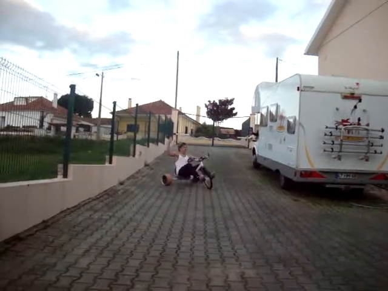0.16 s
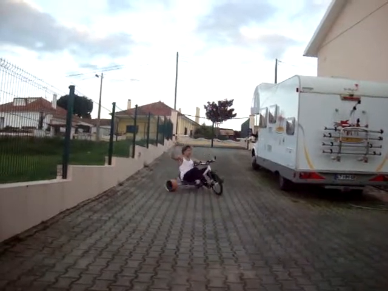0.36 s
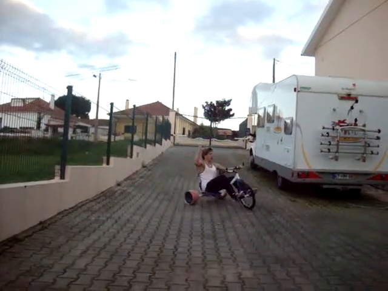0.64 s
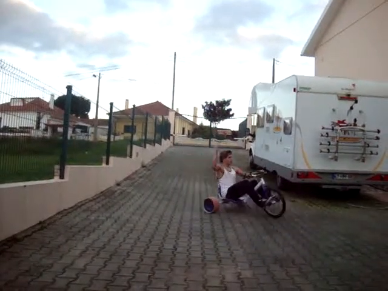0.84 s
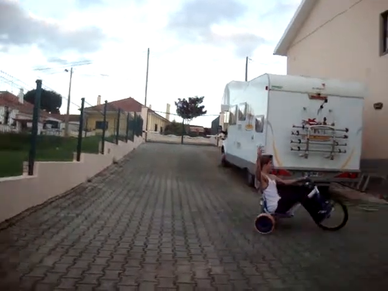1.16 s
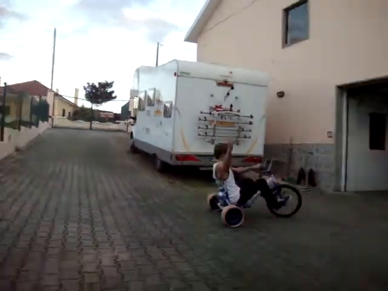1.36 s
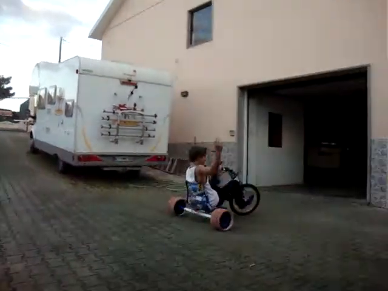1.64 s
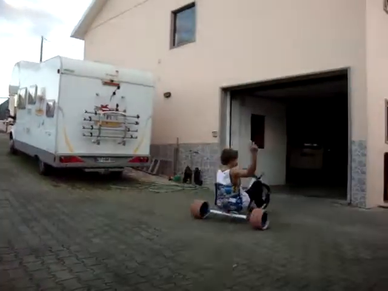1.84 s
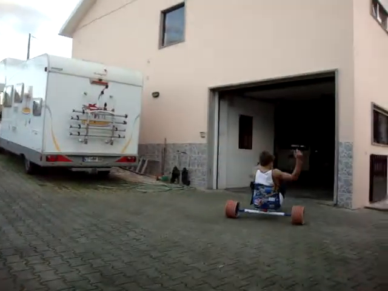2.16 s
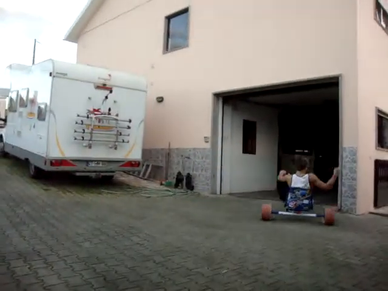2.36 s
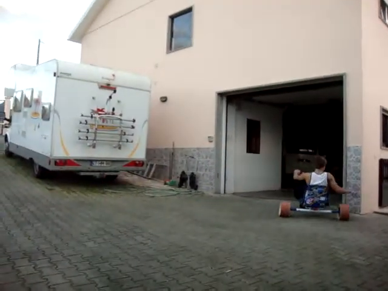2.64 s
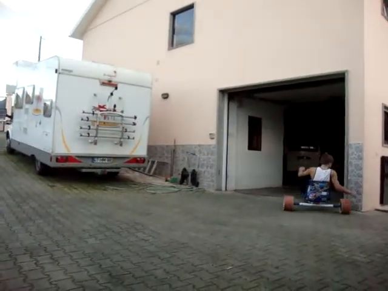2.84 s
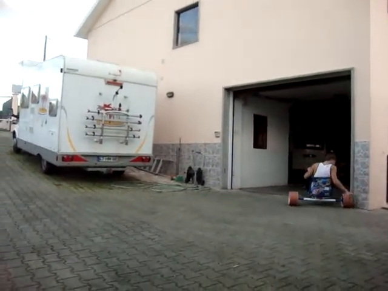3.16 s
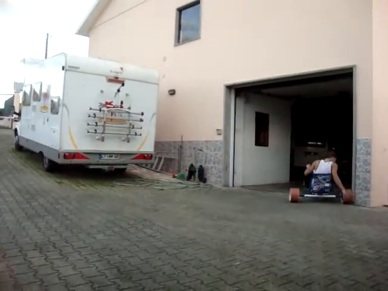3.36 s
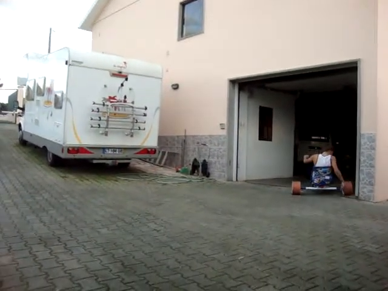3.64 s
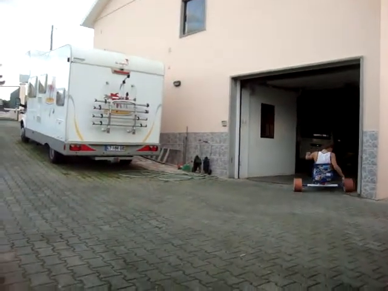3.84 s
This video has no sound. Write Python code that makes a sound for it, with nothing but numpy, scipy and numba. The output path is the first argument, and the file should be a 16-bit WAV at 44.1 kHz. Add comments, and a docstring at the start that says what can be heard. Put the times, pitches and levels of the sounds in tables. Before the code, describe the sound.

A drift trike's hard plastic wheels scrape and rumble over block paving, squealing briefly as it swings round, then crackle to a near stop before a loud, reverberant bang at an open garage; quiet outdoor air.

```python
"""Drift trike sliding into a garage doorway

A drift trike slides past on block paving, swings round and slows at an open garage. Filtered random
clicks give the grit grinding under its plastic rear sleeves, their chatter, hiss and the rolling rumble.
Gliding resonances squeal, then the trike bumps the doorway: noise bursts crack and reverberate in the
garage while decaying modes ring. Coloured noise makes a quiet outdoor background with soft buffets."""
import sys
import numpy as np
from scipy import signal
from scipy.fft import rfft, irfft
from scipy.io import wavfile
from numba import njit

SR = 44100
rng = np.random.default_rng(int(sys.argv[2]) if len(sys.argv) > 2 else 0)


def log_audio(samples):
    """Write samples as a 16-bit WAV file to the path given in sys.argv[1]."""
    # one column per channel
    frames = np.atleast_2d(samples).T
    # limit to full scale, then quantise
    limited = np.clip(frames, -1, 1)
    pcm = np.round(limited * 32767).astype(np.int16)
    wavfile.write(sys.argv[1], SR, pcm)


N = 176400

# Blows against the doorway: a graze, the hit, its rattle and the rebounds
# [t/s, relative crack level/dB, contact decay time/s, relative ring level/dB]
BLOWS = [(3.2107, -7.5, 0.014, -18), (3.2237, -1.5, 0.0036, 0), (3.2287, -4, 0.0092, -19),
         (3.274, -12.5, 0.022, -10.5), (3.326, -24.5, 0.022, -15.5)]


def undb(db):
    """Amplitude ratio: twenty decibels are a factor of ten."""
    return 10 ** (np.asarray(db) / 20)


def unit(x):
    """Normalisation to a root-mean-square value of 1."""
    return x / np.sqrt(np.mean(x ** 2))


def clock():
    """Uniform sampling: the time of every sample in seconds."""
    return np.arange(N) / SR


def on_log_axis(points):
    """Interpolation on a logarithmic frequency axis: (f/Hz, value) points read at every spectral bin."""
    hz, value = np.array(points, float).T
    bins_hz = np.arange(N // 2 + 1) * SR / N
    return np.interp(np.log(bins_hz + 1), np.log(hz), value)


def colour(x, points):
    """Minimum-phase filtering: a causal response of unit energy with the given (f/Hz, level/dB) shape."""
    cepstrum = irfft(np.log(undb(on_log_axis(points))), N)
    # keeping only the positive-time half of the cepstrum makes the response causal
    causal = 2 * cepstrum[:N // 2] * (np.arange(N // 2) > 0)
    response = irfft(np.exp(rfft(causal, N)), N)[:2048]
    return signal.fftconvolve(x, response / np.linalg.norm(response))[:N]


@njit
def svf(x, hz, width):
    """State-variable resonator: two coupled integrators form a band-pass whose centre may move."""
    y, band_state, low_state = np.empty(len(x)), 0., 0.
    for i in range(len(x)):
        g = np.tan(np.pi * hz[i] / SR)
        damping = width / hz[i]
        v = (band_state + g * (x[i] - low_state)) / (1 + g * (g + damping))
        band_state = 2 * v - band_state
        low_state = low_state + 2 * g * v
        y[i] = damping * v
    return y


def band(x, hz, width, order=1):
    """Cascaded resonance: each repetition of the band-pass steepens its sides."""
    for _ in range(order):
        x = svf(x, hz * np.ones(N), float(width))
    return x


def walk(rate):
    """Random fluctuation: random knots, rate per second, joined by lines, with a spread near 1."""
    knots = rng.standard_normal(4096)
    return 1.2 * np.interp(clock() * rate, np.arange(len(knots)), knots)


def clicks(rate, spread_db):
    """Random impulses: independent sizes; positive spread makes a few much larger, negative smaller."""
    sizes = undb(spread_db * np.minimum(rng.exponential(size=N), 6))
    return (rng.random(N) < rate / SR) * sizes


def grit():
    """Shot noise: a dense crackle of random clicks with random sign."""
    return unit(clicks(rate=13000, spread_db=2.32) * rng.choice([-1, 1], N))


def contact(start, length):
    """Transient excitation: a rough contact is sudden noise with exponential decay and unit energy."""
    age = clock() - start
    decay = np.exp(-np.clip(age / length, 0, 60))
    burst = rng.standard_normal(N) * (age >= 0) * decay
    return burst / np.linalg.norm(burst)


def paving_load():
    """Amplitude modulation: paving joints jolt the trike and a random judder varies its load."""
    joint_decay_s, joint_depth, judder_db = 0.0028, 0.14, 0.94
    joints = clicks(rate=110, spread_db=-1)
    jolts = signal.lfilter([1], [1, -np.exp(-1 / (joint_decay_s * SR))], joints)
    judder = undb(judder_db * walk(34))
    return unit((1 + joint_depth * unit(jolts)) * judder)


def grinding():
    """Forced resonance: crushed grit grinds and slips excite the plastic sleeves into chatter."""
    # Grinding spectrum [f/Hz, relative spectral level/dB]
    grind_shape = [(500, -46), (1000, -7), (1500, -4), (2000, 0), (2600, 0.5), (3300, -1.5), (4000, -3),
                   (4800, -4.5), (6500, -15.5), (10000, -52)]
    # Sleeve resonances [f/Hz before the pitch ratio, width/Hz, relative level/dB]
    sleeve = [(2100, 420, -3.5), (2290, 210, 2.5), (2443, 180, 7.5), (3200, 190, -5), (3480, 250, -8)]
    # Wandering pitch of the chatter [t/s, frequency ratio]
    sleeve_pitch = [(0, 0.89), (.6, 1.06), (1.1, 0.99), (1.3, 0.93), (1.65, 1), (2.27, 1), (2.39, .91),
                    (2.55, 1.05), (2.7, 0.94), (2.9, 1)]
    grind_gain_db, chatter_gain_db, slip_spread_db = -1.5, -4.5, 2
    slips = grit() * undb(slip_spread_db * walk(130))
    pitch = np.interp(clock(), *np.array(sleeve_pitch).T)
    chatter = unit(sum(undb(db) * band(slips, hz * pitch, width) for hz, width, db in sleeve))
    return undb(grind_gain_db) * colour(grit(), grind_shape) + undb(chatter_gain_db) * chatter


def hissing():
    """Band-passed friction noise: a flickering hiss with a steady skirt on a lower moving centre."""
    # Moving centre of the hiss [t/s, f/Hz]
    hiss_centre = [(0, 5660), (.42, 6150), (.92, 6070), (1.27, 5350), (1.53, 5750), (1.72, 6330),
                   (2.0, 5520), (2.35, 5410), (2.8, 4700)]
    hiss_gain_db, flicker_db, skirt_gain_db, skirt_ratio = -2, 2.33, -2, 0.843
    centre = np.interp(clock(), *np.array(hiss_centre).T)
    flicker = undb(hiss_gain_db + flicker_db * walk(70))
    core = flicker * unit(band(grit(), centre, width=2130, order=3))
    skirt = unit(band(grit(), skirt_ratio * centre, width=2550, order=3))
    return core + undb(skirt_gain_db) * skirt


def rolling():
    """Broadband rolling excitation: rumble, and a hollow drone of the wheels on the blocks."""
    # Rumble spectrum [f/Hz, relative spectral level/dB]
    roll_shape = [(40, -39.5), (110, -29), (150, -22), (195, -13), (290, -6), (380, -1.5), (520, 2.5),
                  (850, 4.5), (1150, 0.5), (1700, -2), (3500, -27.5)]
    drone_gain_db, drone_end_s, drone_fade_s = -10, 1.54, 0.031
    # the drone ends as the trike swings toward the garage
    fade = np.clip((drone_end_s - clock()) / drone_fade_s, 0, 1)
    drone = fade * unit(band(grit(), 375.4, width=72, order=2))
    return colour(grit(), roll_shape) + undb(drone_gain_db) * drone


def fizzing():
    """High-frequency noise: a fizzing treble band with a random flicker in level."""
    # Treble spectrum [f/Hz, relative spectral level/dB]
    fizz_shape = [(4000, -34.5), (6000, -13.5), (7200, 2.5), (8200, 1), (10000, -1.5)]
    gain_db, flicker_db = 5, 2.4
    return undb(gain_db + flicker_db * walk(70)) * colour(grit(), fizz_shape)


def slide():
    """Superposition under a common load: grinding, hiss, rumble and treble follow the sliding levels."""
    # Course of the slide, relative levels
    # [t/s, grinding level/dB, sleeve hiss level/dB, rumble level/dB, top treble level/dB]
    slide_levels = [(0, -24, -28, -33, -37.5), (0.151, -20, -23.5, -27.5, -34.5),
                    (0.31, -24, -30.5, -32.5, -37.5), (0.39, -20.5, -26.5, -35.5, -36),
                    (0.49, -23.5, -28, -33.5, -37), (0.57, -20.5, -27.5, -30.5, -40),
                    (0.66, -25.5, -27.5, -31.5, -37.5), (0.8, -21.5, -27.5, -30.5, -43.5),
                    (0.87, -27, -30, -32.5, -45), (0.97, -21.5, -25, -31, -41.5), (1.1, -22, -26, -29, -47),
                    (1.27, -20.5, -24, -31.5, -42.5), (1.38, -23.5, -26, -30.5, -49),
                    (1.5, -22.5, -23.5, -32, -47), (1.55, -23.5, -25.5, -38.5, -39),
                    (1.63, -22.5, -28, -38.5, -43), (1.8, -26.5, -32, -34, -42),
                    (1.91, -22.5, -30, -33.0, -41.5), (2.01, -26.5, -30.5, -31, -38.5),
                    (2.24, -21.5, -31, -34.5, -39), (2.38, -24, -32.5, -32, -39.5),
                    (2.48, -26, -34, -35, -41), (2.6, -26, -31.5, -40.5, -46),
                    (2.71, -28.5, -46, -38.5, -50), (2.81, -34.5, -44, -45, -56),
                    (2.91, -43.5, -56, -48.5, -71), (3.04, -55, -62, -51.5, -63), (3.2, -78, -81, -60, -82)]
    t = clock()
    when, *levels = np.array(slide_levels).T
    # the slide fades out over the 20 ms before the main hit
    moving = np.clip((BLOWS[1][0] - t) / .02, 0, 1)
    grind, hiss, roll, fizz = (undb(np.interp(t, when, db)) * moving for db in levels)
    layers = grind * grinding() + hiss * hissing() + roll * rolling() + fizz * fizzing()
    return paving_load() * layers


def outdoors():
    """Coloured noise: a faint distant hum, with soft buffets of air on the microphone."""
    # Neighbourhood spectrum [f/Hz, relative spectral level/dB]
    air_shape = [(30, -29.5), (120, -19.5), (250, -5.5), (420, -7.5), (520, 4), (650, -10), (850, -1),
                 (1300, -7), (2400, -11), (4500, -13), (6500, -21), (10000, -20)]
    # Air buffets [t/s, level/dB, Gaussian half-length/s]
    buffets = [(0.068, -48, 0.034), (0.157, -49, 0.036), (.262, -55, 0.017), (0.493, -48, .008)]
    air_db, waver_db = -50, 0.5
    air = undb(air_db + waver_db * walk(6)) * colour(rng.standard_normal(N), air_shape)
    puffs = sum(undb(db) * np.exp(-((clock() - when) / length) ** 2) for when, db, length in buffets)
    return air + puffs * unit(band(rng.standard_normal(N), 65, width=170))


def catches():
    """Stick-slip: brief band-passed rasps and chirps where a sleeve grips the paving and lets go."""
    # Catches [t/s, level/dB, centre f/Hz, width of each filter pass/Hz, Gaussian half-length/s]
    catch_events = [(0.683, -21.5, 6300, 900, 0.0048), (0.746, -19.5, 2320, 700, 0.008),
                    (1.302, -17, 2290, 250, 0.0048), (1.412, -21, 2370, 700, 0.012),
                    (1.438, -16.5, 3000, 300, 0.0052), (1.497, -23, 2330, 600, 0.023),
                    (1.526, -17.5, 6330, 800, 0.0042), (1.893, -18.5, 2200, 2600, 0.0043),
                    (1.908, -20.5, 2400, 1800, 0.0094), (1.928, -19, 2300, 1800, 0.0038),
                    (2.534, -20.5, 3350, 1200, 0.0099)]
    out = 0
    for when, db, hz, width, length in catch_events:
        swell = np.exp(-((clock() - when) / length) ** 2)
        rasp = swell * band(grit(), hz, width, order=2)
        # before its level, each rasp takes the energy of its envelope
        out = out + undb(db) * rasp * np.linalg.norm(swell) / np.linalg.norm(rasp)
    return out


def squeals():
    """Friction-excited resonance: hoarse gliding squeals of plastic dragged sideways, varying in grip."""
    # Squeals in the tightest part of the turn [start t/s, end t/s, level/dB, first f/Hz, last f/Hz]
    squeal_events = [(1.132, 1.207, -22.5, 2620, 2720), (1.195, 1.315, -23.5, 2330, 2260),
                     (1.302, 1.532, -30, 2710, 3170), (1.595, 1.647, -23.5, 2250, 2680)]
    fade_s, grip_db = 0.025, 2.5
    t, out = clock(), 0
    for start, end, db, first_hz, last_hz in squeal_events:
        swell = np.clip(np.minimum(t - start, end - t) / fade_s, 0, 1)
        hz = np.interp(t, [start, end], [first_hz, last_hz])
        grip = undb(grip_db * walk(45))
        tone = swell * grip * band(grit(), hz, width=200, order=2)
        out = out + undb(db) * tone * np.linalg.norm(swell) / np.linalg.norm(tone)
    return out


def scrub():
    """Sparse shot noise: separate coarse grains crackle under the sleeves as the trike slows."""
    centre_s, half_length_s, level_db = 2.46, 0.34, -34
    grains = clicks(rate=800, spread_db=2) * rng.choice([-1, 1], N)
    # a fourth-power exponent gives a flat top and quick ends
    swell = np.exp(-np.square(((clock() - centre_s) / half_length_s) ** 2))
    return undb(level_db) * swell * unit(band(grains, 3080, width=2800, order=2))


def garage(x):
    """Reverberation: direct sound plus a diffuse tail whose frequency bands decay at their own rates."""
    # Reverberation times [f/Hz, t60/s]
    decay_times = [(200, 0.83), (500, 0.88), (1200, 0.74), (2500, 0.56), (5000, 0.6), (9000, 0.93)]
    tail_db, delay_s = -1.5, 0.0076
    t, tail = clock(), 0
    hz, t60 = np.array(decay_times).T
    noise = rfft(rng.standard_normal(N))
    # overlapping bands, each weighted 1 at its own frequency and 0 at the others
    for share, decay_s in zip(np.eye(len(hz)), t60):
        band_noise = irfft(noise * on_log_axis(list(zip(hz, share))), N)
        tail = tail + band_noise * np.exp(-np.log(1000) * t / decay_s)
    tail = tail * (t > delay_s)
    return x + undb(tail_db) * signal.fftconvolve(x, tail / np.linalg.norm(tail))[:N]


def knocks():
    """Impact excitation: short contacts through a resonance give light knocks and ticks of the frame."""
    # Knocks as the trike stops and settles
    # [t/s, level of the direct tap's total energy/dB, centre f/Hz, width/Hz, contact decay time/s]
    knock_events = [(2.882, -15, 7000, 9000, 0.0017), (3.076, -15, 1040, 1080, 0.0045),
                    (3.171, -23.5, 900, 4000, 0.0035), (3.541, -15, 5000, 9000, 0.0019),
                    (3.627, -16.5, 1100, 3000, 0.022), (3.878, -16, 600, 1810, .016)]
    out = 0
    for when, db, hz, width, length in knock_events:
        # the tiny offset keeps the filter state from vanishing
        tap = band(contact(when, length) + 1e-18, hz, width)
        out = out + undb(db) * tap / np.linalg.norm(tap)
    return garage(out)


def thump():
    """Modal impact: every blow on the doorway cracks in the garage and rings the same unsteady modes."""
    # Modes of the struck doorway and frame [f/Hz, relative level/dB, t60/s]
    modes = [(205, -15, 0.25), (226.9, -5.5, 0.4), (245, -2, 0.26), (365.4, 0, 0.62), (383, -1, 0.53),
             (442, 5, 0.18), (495, 2, 0.16), (670, -2.5, 0.42), (735, -8, 0.5), (912, -6, .28),
             (1210, -7.5, 0.4), (1425, -8, 0.42), (1650, -7, .25), (1984, -1, .18), (2170, -8, 0.2),
             (2480, -5, .3)]
    # Crack spectrum [f/Hz, relative spectral level/dB]
    crack_shape = [(60, -34), (125, -26), (200, -6), (290, -9), (450, -1.5), (800, -7.5), (1400, -3.5),
                   (2200, -1.5), (3200, -12.5), (4300, -10), (5500, -19), (8000, -31.5), (10000, -37)]
    crack_gain_db, ring_gain_db, attack_s = 10.5, -25.5, 0.0025
    phase_smear_rad, waver_db, rattle_db = 0.9, 3, 2
    crack = ring = 0
    for when, crack_db, length, ring_db in BLOWS:
        age = np.maximum(clock() - when, 0)
        crack = crack + undb(crack_db) * contact(when, length)
        for k, (hz, mode_db, t60) in enumerate(modes):
            shape = (1 - np.exp(-age / attack_s)) * np.exp(-np.log(1000) * age / t60)
            phase = 2 * np.pi * hz * age + phase_smear_rad * walk(55)
            tone = (-1) ** k * np.sin(phase)  # neighbouring modes have opposite sign
            level = undb(ring_db + mode_db + waver_db * walk(45))
            ring = ring + level * shape * tone
    # loose parts roughen the crack
    rattle = unit(undb(rattle_db * walk(300)))
    return undb(crack_gain_db) * colour(rattle * garage(crack), crack_shape) + undb(ring_gain_db) * ring


def scene():
    """Linear superposition: all sources add at one microphone, and both channels are alike."""
    ground = slide() + catches() + squeals() + scrub()
    return np.tile(ground + knocks() + thump() + outdoors(), (2, 1))


def record(dry):
    """Low-pass filtering: a tenth-order elliptic filter cuts steeply above 10 kHz."""
    return signal.sosfilt(signal.ellip(10, .2, 70, 10000, fs=SR, output="sos"), dry)


dry = scene()
out = record(dry)
log_audio(out)
```